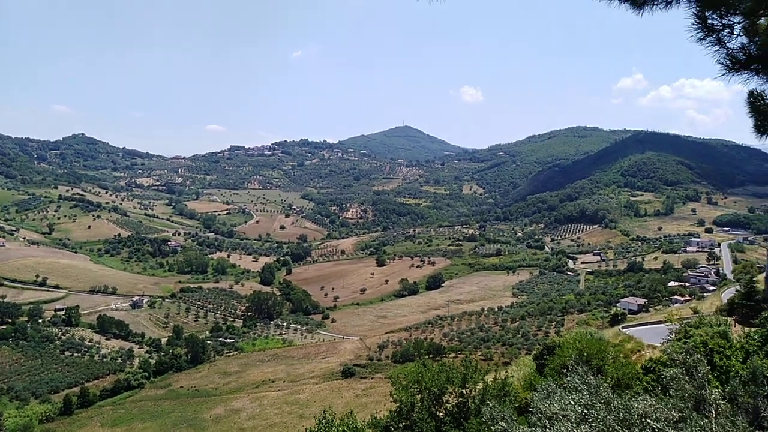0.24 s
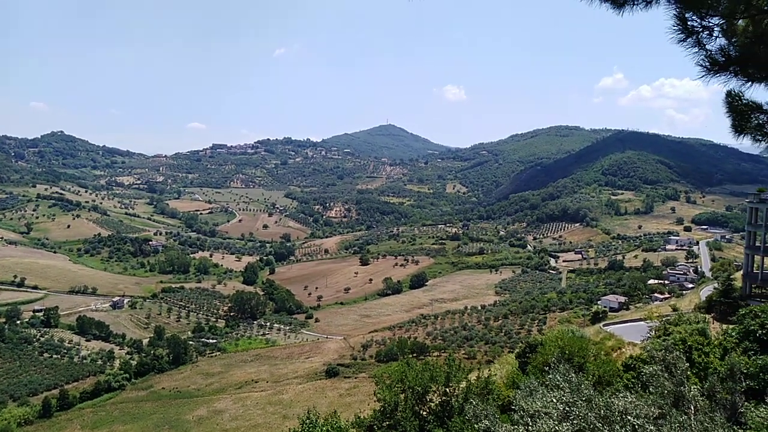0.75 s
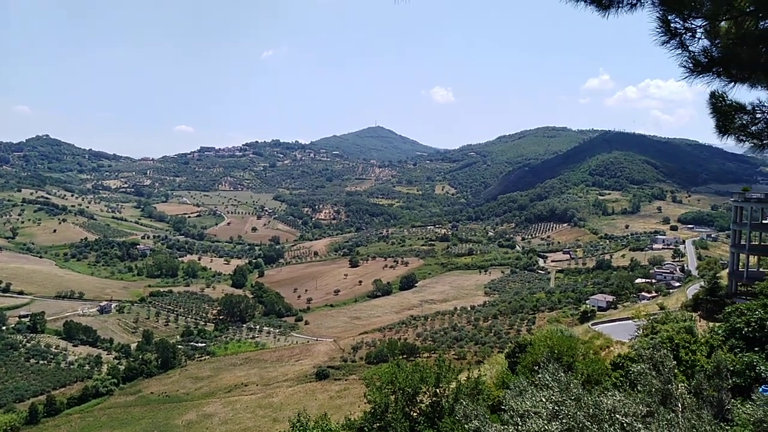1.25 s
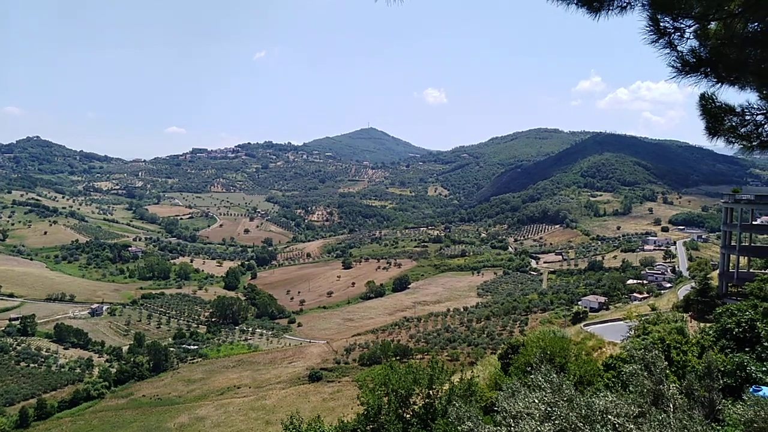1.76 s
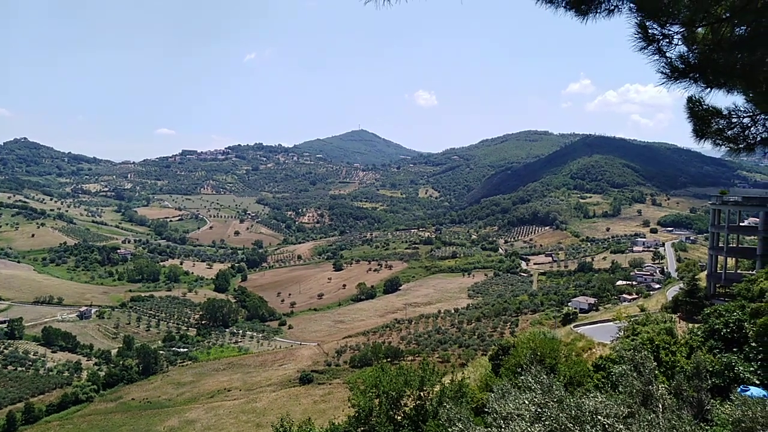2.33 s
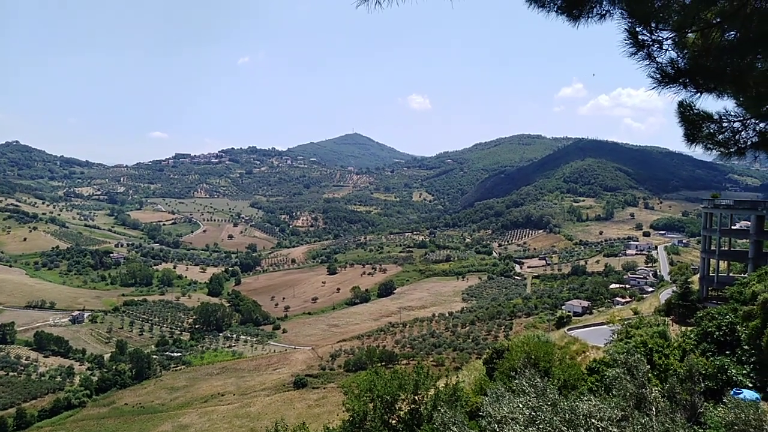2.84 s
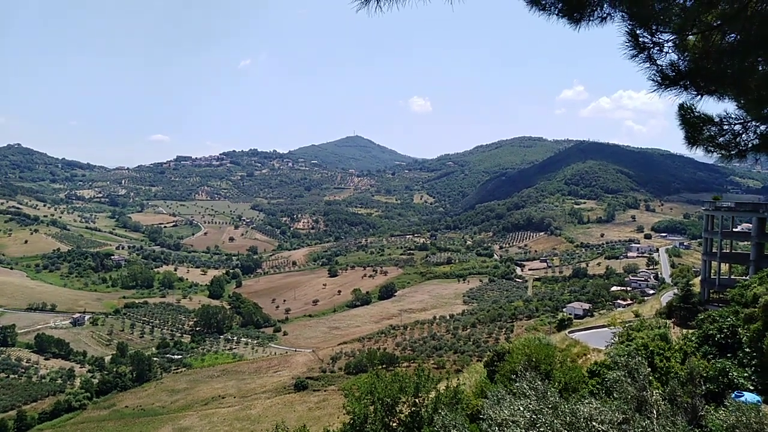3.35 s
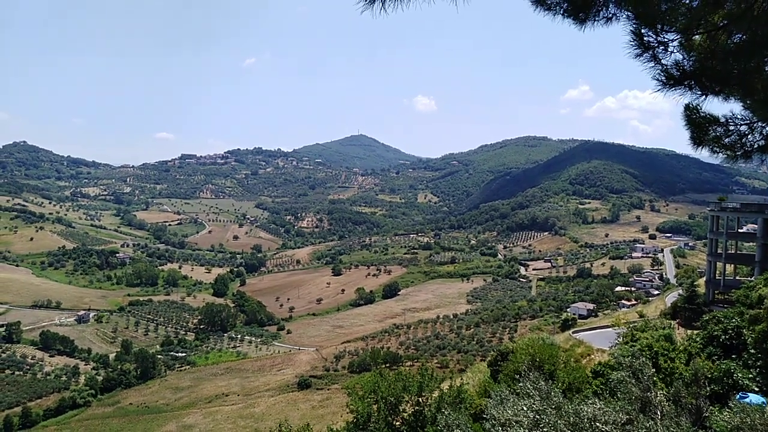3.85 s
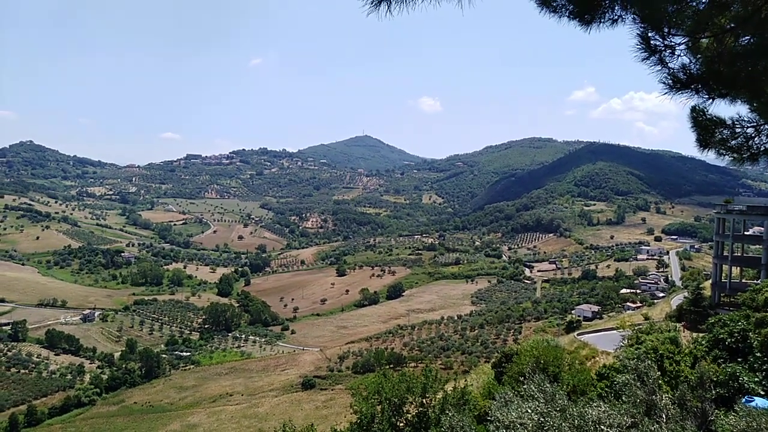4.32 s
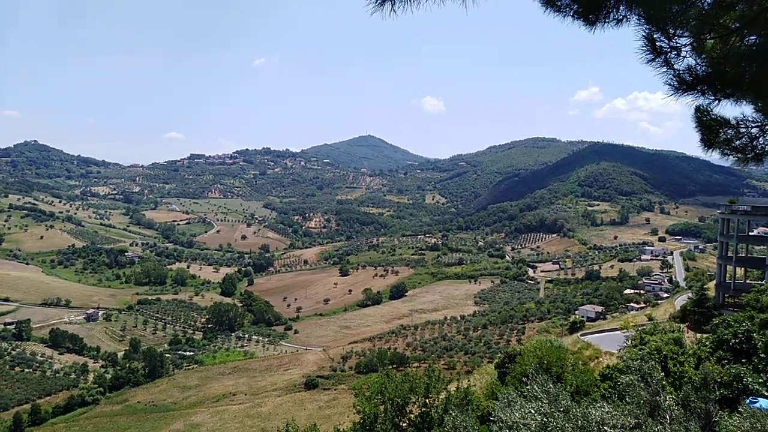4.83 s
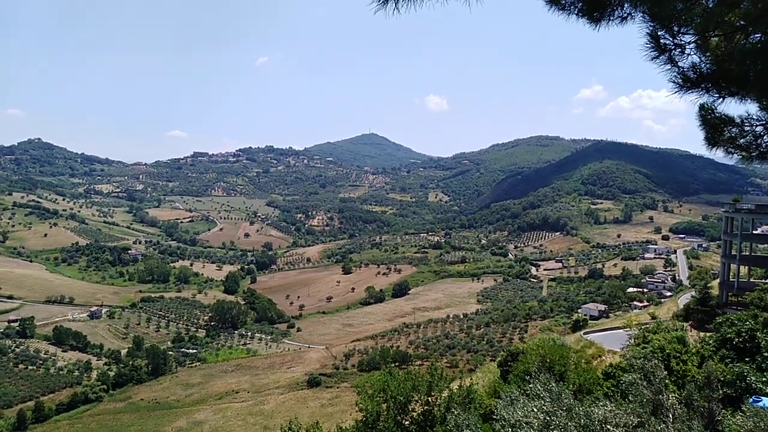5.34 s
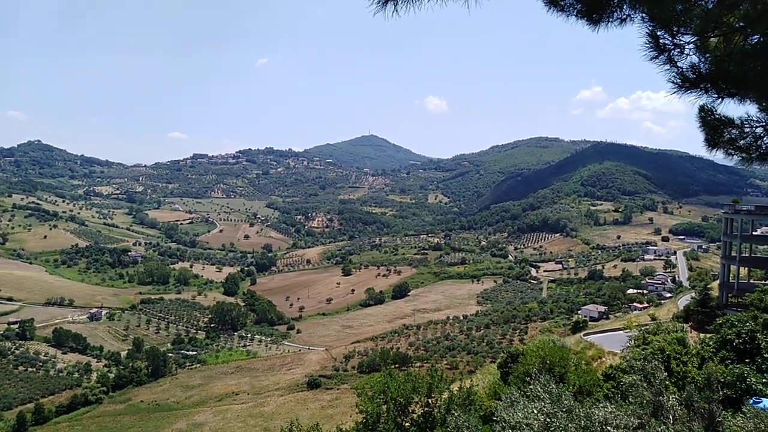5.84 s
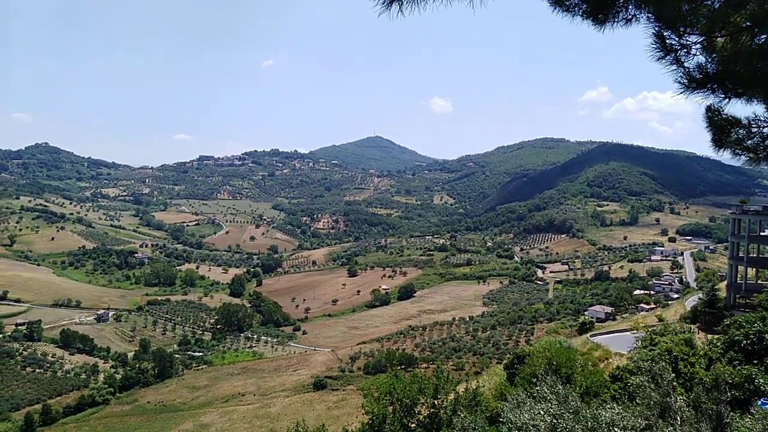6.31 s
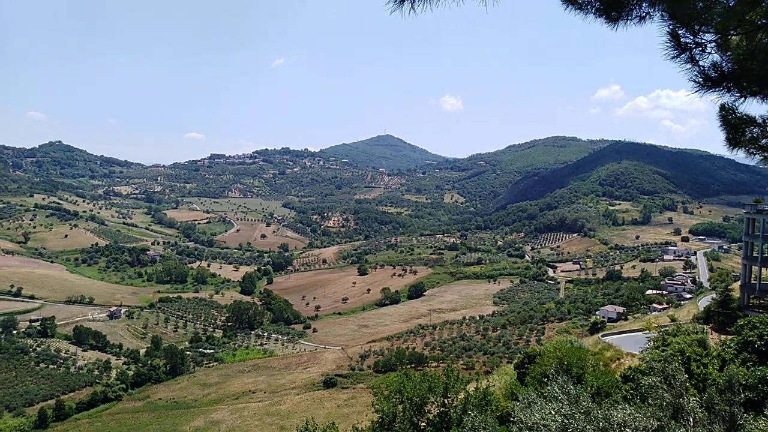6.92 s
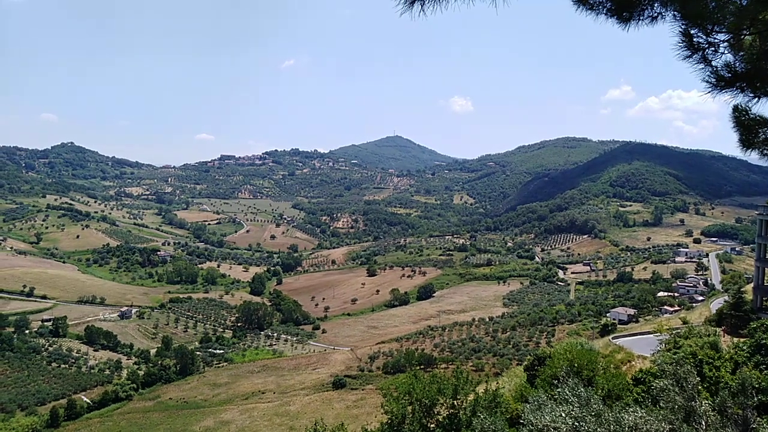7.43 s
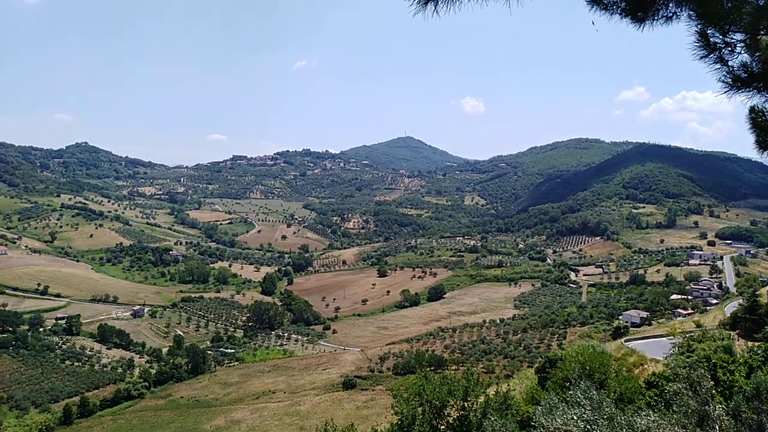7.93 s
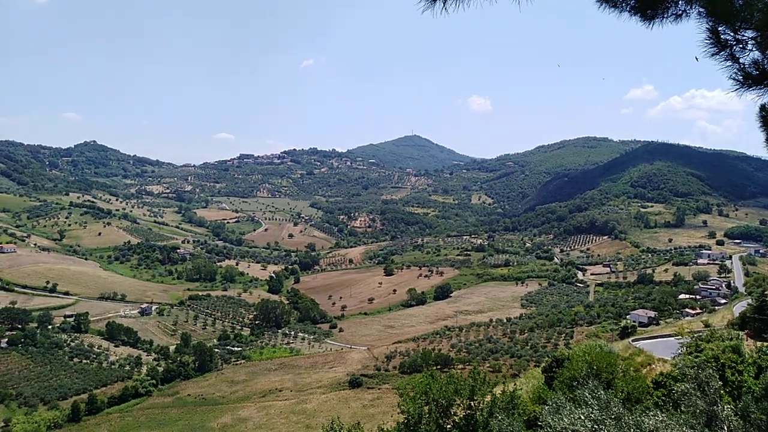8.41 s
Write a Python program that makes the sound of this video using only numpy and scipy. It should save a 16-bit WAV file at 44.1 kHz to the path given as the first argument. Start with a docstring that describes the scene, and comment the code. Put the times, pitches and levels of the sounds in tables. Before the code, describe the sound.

A cicada close on the right rasps in quick, high-pitched pulses over the faint hiss of a distant chorus. After about three seconds a second cicada joins with longer, grittier buzzes, and both keep singing to the end. Light wind rumbles on the microphone, mostly in the first half, with a couple of soft bumps. Late on, a few faint knocks and bird notes come from the open valley.

```python
"""Cicadas above a summer valley

Close on the right, a cicada in a pine snaps its tymbals in quick rasping syllables that ring its body.
A neighbour joins with a longer buzz, over the hiss of a far chorus. Light wind and soft bumps
touch the microphone, and faint knocks and bird notes rise from below."""
import sys
import numpy as np
from scipy import signal
from scipy.fft import rfft, irfft
from scipy.io import wavfile
from scipy.ndimage import uniform_filter1d

SR = 44100
rng = np.random.default_rng(int(sys.argv[2]) if len(sys.argv) > 2 else 0)


def store_wav(level_fs):
    """Save 16-bit WAV to argv[1]."""
    pcm = np.round(np.clip(np.atleast_2d(level_fs), -1, 1) * 32767)
    wavfile.write(sys.argv[1], SR, pcm.T.astype(np.int16))


N = 382347
TIME = np.arange(N) / SR

# body resonances of the neighbour and the far singers: (frequency [Hz], width [Hz], relative level [dB])
CICADA_BODY = [(2323, 249, -17.5), (3060, 385, -20), (4412, 297, -4.5), (4737, 284, 1), (5356, 520, -1),
               (5890, 1000, -11), (6970, 970, -10), (8590, 1470, -20.5), (10700, 1000, -41.5),
               (12530, 590, -36)]


def near_cicada():
    """The closest cicada rasps at one level, in runs of evenly paced syllables."""
    # runs of song: (start [s], end [s], syllables [count])
    runs = [(-.030, .876, 6), (.930, 1.349, 3), (1.405, 1.552, 1), (1.599, 1.891, 2), (1.951, 2.226, 2),
            (2.245, 2.487, 1), (2.520, 2.647, 1), (2.696, 2.837, 1), (2.890, 3.007, 1), (3.058, 3.211, 1),
            (3.252, 4.935, 10), (4.988, 5.478, 3), (5.518, 5.833, 1), (5.869, 6.010, 1), (6.057, 6.577, 1),
            (6.625, 7.312, 1), (7.352, 7.690, 2), (7.745, 8.750, 6)]
    # body resonances: (frequency [Hz], width [Hz], relative level [dB])
    body = [(2388, 258, -23), (2841, 76, -20.5), (3163, 480, -27), (4787, 314, -3), (4937, 250, -2),
            (5410, 333, -2), (5975, 850, -11), (7123, 242, -6.5), (7778, 200, -10.5), (8480, 370, -25),
            (9150, 150, -24.5), (10627, 570, -25.5), (12800, 100, -31.5)]
    rest_s = .057
    syllables = []
    for start, end, count in runs:
        edges = np.linspace(start, end + rest_s, round(count) + 1)
        syllables += zip(edges[:-1], edges[1:] - rest_s)
    snaps = tymbals(syllables, pulse_hz=222, limp=.025, jitter=.012,
                    rough_db=.6, first_db=-1.2, settle_s=.02)
    song = ring_body(snaps, body, crackle_db=-12, sac_hz=4600, sac_width_hz=600)
    return from_db(-27) * tree(song, needles_db=-4, grove_db=-9.5)


def neighbour_cicada():
    """A second cicada in the same tree holds longer, grittier buzzes, each with an accented attack."""
    # buzzes: (start [s], end [s])
    buzzes = [(3.30, 3.540), (3.610, 4.932), (4.995, 5.830), (5.878, 6.014), (6.068, 8.68)]
    # it warms up, then tires a little: (time [s], relative level [dB])
    effort = [(3.3, -36.5), (3.65, -33), (4.1, -32.5), (6.2, -32.5), (8.67, -33)]
    snaps = tymbals(buzzes, pulse_hz=212.9, limp=.04, jitter=.05, rough_db=-1, first_db=3, settle_s=.12)
    song = ring_body(snaps, CICADA_BODY, crackle_db=-2, sac_hz=4510, sac_width_hz=1250)
    return tree(from_db(envelope(effort) + 2.5) * song, needles_db=1, grove_db=-9)


def tymbals(syllables, pulse_hz, limp, jitter, rough_db, first_db, settle_s):
    """Two tymbals snap in turn, slightly lopsided; their strength settles, then tapers at the end."""
    taper_db, taper_s = -4, .0078
    snaps = np.zeros(N)
    for start, end in syllables:
        k = np.arange(int((end - start) * pulse_hz) + 3)
        timing, strength = rng.standard_normal((len(k), 2)).T
        pace_hz = pulse_hz * (1 + .01 * rng.standard_normal())
        gaps = (1 + limp * (-1) ** k + jitter * timing) / pace_hz
        gaps[0] *= 1.65  # the first snap stands alone
        times = start + np.cumsum(gaps) - gaps
        attack_db = first_db * np.exp(-(times - start) / settle_s)
        release_db = taper_db * np.exp(-abs(end - times) / taper_s)
        snap_db = rough_db * strength + attack_db + release_db
        heard = (times < end) & (times >= 0) & (times < TIME[-1])
        snaps[(times[heard] * SR).astype(int)] = from_db(snap_db[heard])
    return snaps


def ribs(snaps, gap_ms, carry):
    """Each snap buckles the ribs one after another: a dying volley of clicks (an all-pass comb)."""
    poles = np.zeros(int(gap_ms * SR / 1000) + 1)
    poles[0], poles[-1] = 1, -carry
    return signal.lfilter(poles[::-1], poles, snaps + 1e-18)


def ring_body(snaps, body, crackle_db, sac_hz, sac_width_hz):
    """Rib clicks ring the body; the air sac holds its pitch longest, so each snap glides down."""
    crackle_s = .0051
    decays = signal.lfilter([1], [1, -np.exp(-1 / (crackle_s * SR))], snaps + 1e-18)
    crackle = decays * rng.standard_normal(N)
    volley = ribs(snaps, gap_ms=.76, carry=.6)
    drive = unit_power(volley) + from_db(crackle_db) * unit_power(crackle)
    ringing = colour(drive, resonances(body))
    radius = np.exp(-np.pi * sac_width_hz / SR)
    sac = np.array([1, -2 * radius * np.cos(2 * np.pi * sac_hz / SR), radius ** 2])
    song = unit_power(signal.lfilter(sac[::-1], sac, ringing))
    singing = uniform_filter1d(1. * (snaps != 0), size=441) > 1e-6
    return song * np.sqrt(singing.mean())  # unit power while singing


def tree(song, needles_db, grove_db):
    """The right mic port gets the song first, with branch echoes; the shaded left gets more scatter."""
    # echoes off trunk and branches at the right port: (delay [ms], gain [dB])
    branches = [(2.9, -11), (6.7, -8.5), (9.1, -26)]
    # the left port lies in the shadow of the device: (frequency [Hz], gain [dB])
    shadow = [(2000, -4.5), (3000, -6), (4000, -9), (5000, -9.5), (6300, -12.5), (8000, -13), (12000, -7.5)]
    left_lag_samples = 11
    paths = from_db(grove_db + np.array([[3], [0]])) * scatter(t60=.19, channels=2)
    paths[0] += from_db(needles_db) * scatter(t60=.047, channels=1)[0]
    paths[0, left_lag_samples] += .9  # direct sound
    paths[1, 0] += 1
    for delay_ms, db in branches:
        paths[1, int(delay_ms * SR / 1000)] += from_db(db)
    left, right = signal.oaconvolve(song, paths, axes=1)[:, :N]
    return np.vstack([colour(left, shadow), right])


def scatter(t60, channels):
    """Countless small echoes blur into a dying tail of unit energy."""
    age = TIME[:SR // 2]
    tail = rng.standard_normal((channels, len(age))) * from_db(-60 * age / t60)
    return tail / np.linalg.norm(tail, axis=1, keepdims=True)


def far_chorus():
    """Many far singers blur into a hiss; one of them throbs through it at its own pace."""
    # swell of the chorus: (time [s], relative level [dB])
    swell = [(0, -44), (.45, -42.5), (.85, -41.5), (1.35, -46), (2.1, -47), (2.7, -42), (3.15, -37),
             (4, -46), (6, -44), (7, -43), (8.67, -40)]
    starts = np.cumsum(rng.normal(.172, .011, size=60)) - .2
    snaps = tymbals(zip(starts, starts + .125), pulse_hz=223, limp=.036, jitter=.03,
                    rough_db=5, first_db=-11, settle_s=.037)
    song = ring_body(snaps, CICADA_BODY, crackle_db=-11, sac_hz=4700, sac_width_hz=480)
    singer = tree(song, needles_db=-4, grove_db=.5)
    lean_right = from_db([[-7], [-1]])
    hiss = noise(resonances(CICADA_BODY)) * from_db(1.9 * drift(4.6)) * lean_right
    # the air soaks up the highest treble on the way: (frequency [Hz], gain [dB])
    distance = [(2500, 2.5), (5000, -2), (8000, 4.5), (13000, -33.5)]
    return from_db(envelope(swell)) * colour(singer + hiss, distance)


def wind():
    """Eddies rumble on each mic port; strong gusts reach higher in pitch."""
    # rumble of the breeze: (frequency [Hz], relative density [dB])
    breeze_tone = [(15, -24), (25, -28.5), (59, -1.5), (80, 2), (118, -9.5), (139, -12.5), (172, -19.5),
                   (242, -39.5), (500, -57), (650, -71), (1100, -120)]
    # rumble of a full gust: (frequency [Hz], relative density [dB])
    gust_tone = [(15, -63), (25, -44), (57, 1), (88, 1.5), (117, -3.5), (167, -16), (270, -41), (539, -59),
                 (600, -60), (780, -59), (1320, -120)]
    level_db = wind_strength()
    gust_mix = np.clip((level_db + 60) / 14, 0, 1)
    rumble = np.sqrt(1 - gust_mix) * noise(breeze_tone) + np.sqrt(gust_mix) * noise(gust_tone)
    buffeting = rumble * from_db(level_db + 3.15 * drift(30))
    low_cut = signal.butter(2, 45, "high", fs=SR, output="sos")
    lean_right = from_db([[-3.5], [4.2]])
    return signal.sosfilt(low_cut, buffeting) * lean_right


def wind_strength():
    """Gusts swell and fall as bell curves on top of the breeze; in dB."""
    # breeze on the ports: (time [s], relative level [dB])
    breeze = [(0, -61), (.45, -54.5), (.85, -62), (1.5, -56.5), (2.1, -51.5), (2.5, -54), (3.8, -48),
              (4.35, -61), (5.8, -62), (6.4, -65.5), (8.67, -67.5)]
    # gusts that buffet the ports: (peak time [s], width [s], relative level [dB])
    gusts = [(0.036, .04, -43), (0.219, 0.037, -40), (1.049, 0.032, -41.5), (1.128, 0.025, -36),
             (1.86, 0.13, -48), (2.254, 0.16, -44), (2.612, 0.058, -44), (2.766, .04, -41.5),
             (3.073, .08, -39), (3.242, 0.074, -38), (3.492, 0.06, -44.5), (3.722, 0.16, -44),
             (3.995, 0.11, -45.5), (4.147, 0.042, -43.5), (4.48, 0.032, -52), (7.214, 0.036, -48.5)]
    power = from_db(envelope(breeze) + 1.3 * drift(11)) ** 2
    for peak, width, db in gusts:
        power += (from_db(db) * np.exp(-2 * ((TIME - peak) / width) ** 2)) ** 2
    return 10 * np.log10(power)


def knocks_and_mic_bumps():
    """Soft low bumps on the microphone and a few faint distant knocks: noise that strikes and dies."""
    # mic bumps (all rows except 6.811 s and 6.943 s) and two distant knocks: # (time [s], level [dB], band
    # frequency [Hz], decay by 60 dB [s])
    thuds = [(0.034, -48, 181, 0.2), (0.479, -75, 620, 0.37), (1.022, -45, 196, 0.13),
             (1.85, -72.5, 446, 0.62), (6.811, -58, 1150, 0.33), (6.943, -58.5, 667, 0.29),
             (7.188, -61.5, 241, 0.4)]
    out = np.zeros((2, N))
    age = TIME[:SR // 2]
    attack = np.minimum(age / .0014, 1)
    for start, db, hz, t60 in thuds:
        band = signal.butter(4, [hz * .44, hz * 1.37], "band", fs=SR, output="sos")
        thud = unit_power(signal.sosfilt(band, rng.standard_normal((2, len(age)))))
        at = int(start * SR)
        out[:, at:at + len(age)] += thud * from_db(db - 60 * age / t60) * attack
    return out


def far_birds():
    """A few faint notes, made hoarse by a fast waver in pitch."""
    # notes: (peak time [s], width [s], pitch [Hz], level [dB])
    notes = [(6.656, 0.084, 1660, -77), (6.66, 0.046, 820, -79), (7.47, .1, 1470, -83),
             (7.57, 0.036, 1330, -67), (8.206, .07, 1410, -78), (8.57, .08, 1100, -79)]
    out = np.zeros(N)
    for peak, width, hz, db in notes:
        span = abs(TIME - peak) < 2 * width
        pitch_hz = hz * (1 + .032 * drift(270)[span])
        swell = np.exp(-(2 * (TIME[span] - peak) / width) ** 2)
        out[span] += from_db(db) * swell * np.sin(2 * np.pi * np.cumsum(pitch_hz) / SR)
    return out


def valley_air():
    """Still air lays a soft, dark bed under everything."""
    # tone of the air: (frequency [Hz], relative density [dB])
    air_tone = [(100, 8.5), (300, -2.5), (600, -5.5), (1000, -9), (1600, -11.5), (4000, -18), (12000, -19)]
    return from_db(-79) * noise(air_tone)


def resonances(modes):
    """Spectrum of a few rounded, steep-sided peaks."""
    hz = np.geomspace(1000, SR / 2, 400)
    power = sum(from_db(db) ** 2 / (1 + ((hz - centre) / width) ** 2 / 2) ** 6
                for centre, width, db in modes)
    return np.column_stack([hz, 10 * np.log10(power + 1e-7)])


def colour(x, spectrum):
    """Minimum-phase EQ through points of (frequency [Hz], gain [dB])."""
    size = 8192
    hz, db = np.transpose(spectrum)
    grid_hz = np.maximum(np.fft.rfftfreq(size, 1 / SR), 1)
    gain = from_db(np.interp(np.log(grid_hz), np.log(hz), db))
    cepstrum = irfft(np.log(gain))
    cepstrum[1:size // 2] *= 2
    cepstrum[size // 2 + 1:] = 0
    response = irfft(np.exp(rfft(cepstrum)))[:size // 2]
    return signal.oaconvolve(np.atleast_2d(x), response[None], axes=1)[:, :N]


def noise(spectrum):
    """Coloured noise, unrelated in the two channels."""
    return unit_power(colour(rng.standard_normal((2, N)), spectrum))


def drift(rate_hz):
    """Smooth random wander of unit power."""
    knots = rng.standard_normal(int(rate_hz * N / SR) + 3)
    ramps = np.interp(TIME * rate_hz, np.arange(len(knots)), knots)
    return unit_power(uniform_filter1d(ramps, int(SR / rate_hz / 2) + 1))


def envelope(points):
    """Straight ramps through points of (time [s], level [dB])."""
    return np.interp(TIME, *np.transpose(points))


def from_db(db):
    """Decibels to gain."""
    return 10 ** (np.asarray(db) / 20)


def unit_power(x):
    """Scale to an RMS of one."""
    return x / np.sqrt(np.mean(x ** 2) + 1e-20)


def scene():
    """Cicadas, which radiate nothing low, over wind, mic bumps and the valley."""
    low_cut = signal.butter(8, 1750, "high", fs=SR, output="sos")
    cicadas = signal.sosfilt(low_cut, near_cicada() + neighbour_cicada() + far_chorus())
    return cicadas + wind() + valley_air() + knocks_and_mic_bumps() + far_birds()


def record(dry):
    """The top is cut steeply; short fades keep both ends free of clicks."""
    cutoff_hz, fade_s = 14200, .004
    high_cut = signal.ellip(10, .1, 80, cutoff_hz, fs=SR, output="sos")
    fade = np.minimum(np.minimum(TIME, TIME[-1] - TIME) / fade_s, 1)
    return fade * signal.sosfilt(high_cut, dry)


dry = scene()
out = record(dry)
store_wav(out)
```